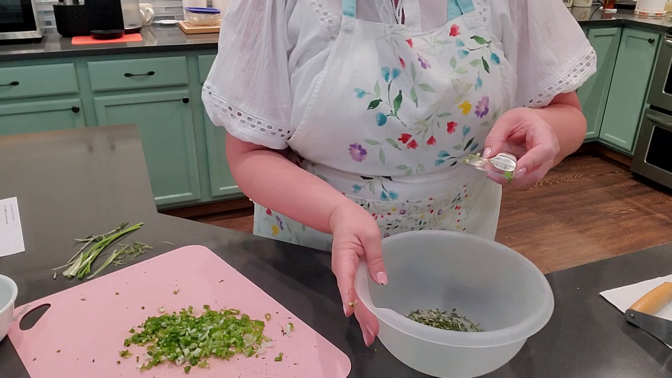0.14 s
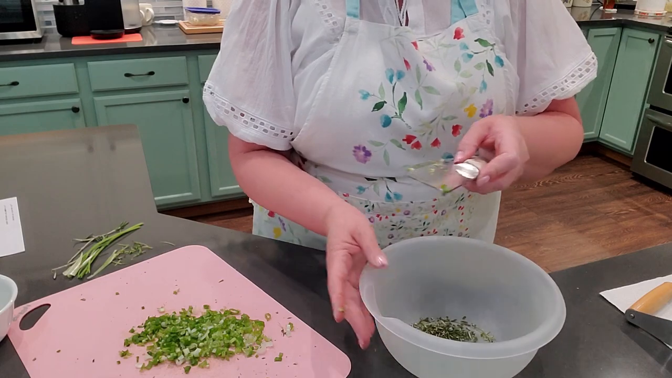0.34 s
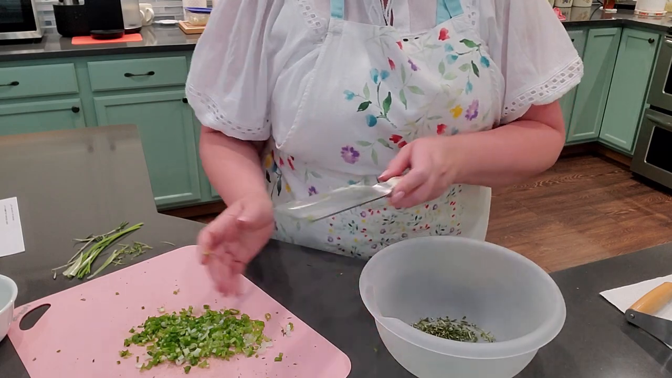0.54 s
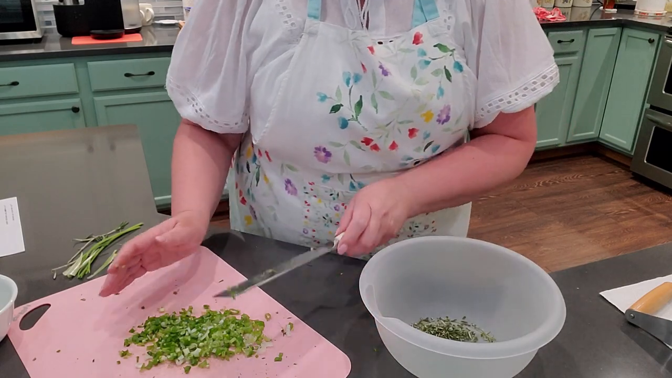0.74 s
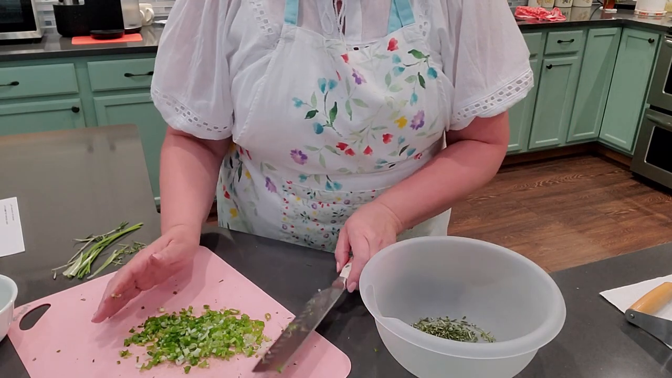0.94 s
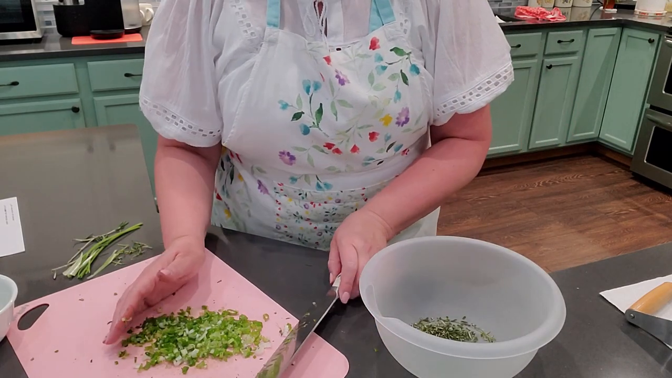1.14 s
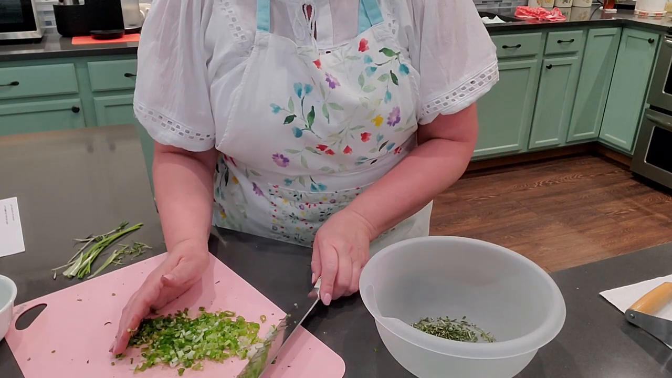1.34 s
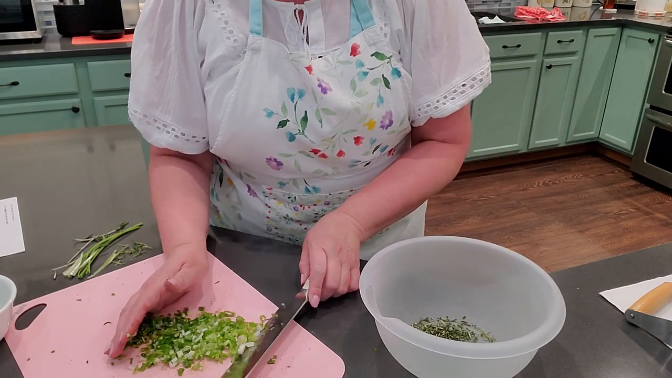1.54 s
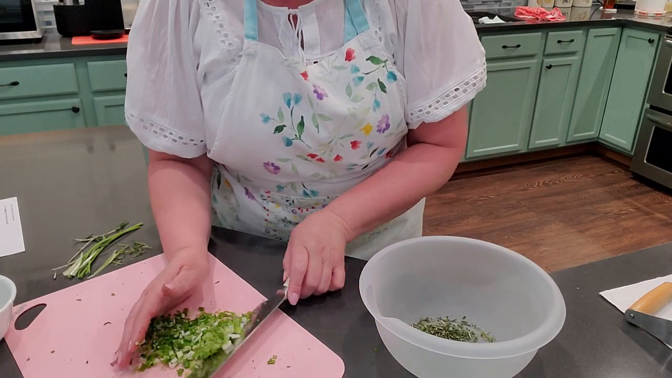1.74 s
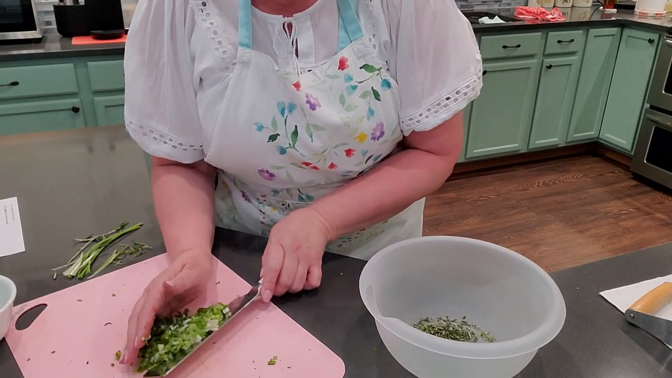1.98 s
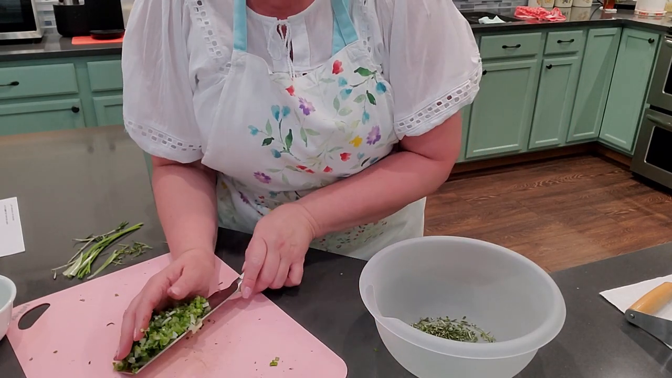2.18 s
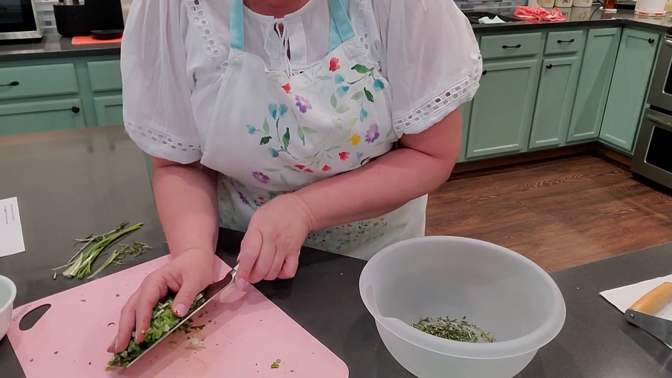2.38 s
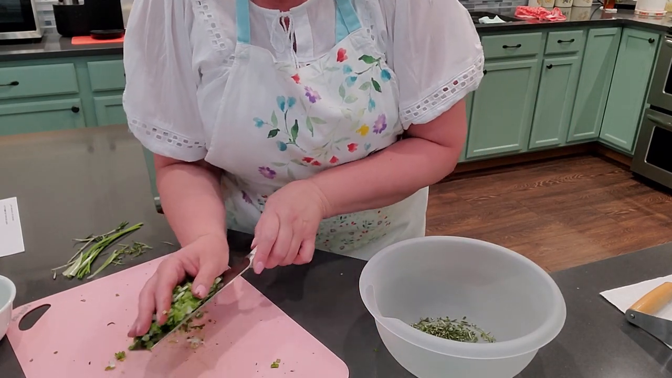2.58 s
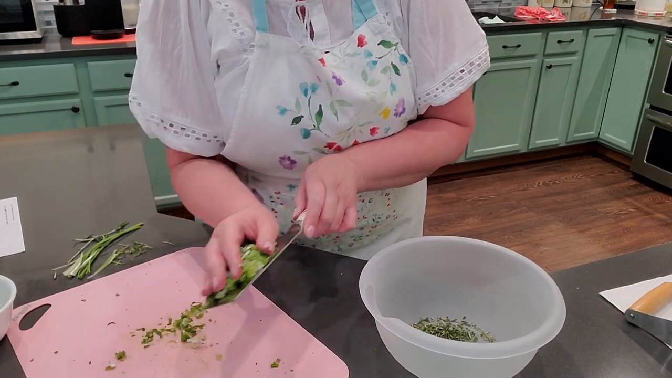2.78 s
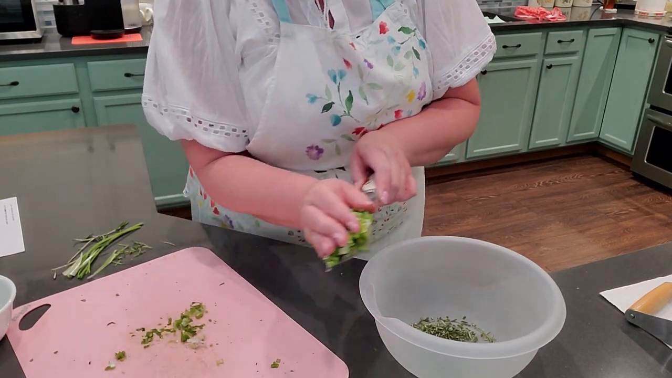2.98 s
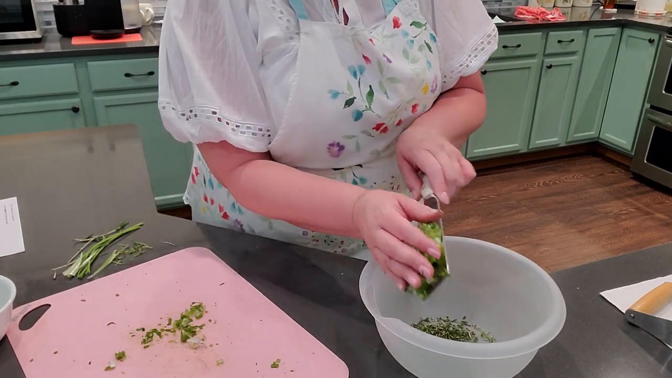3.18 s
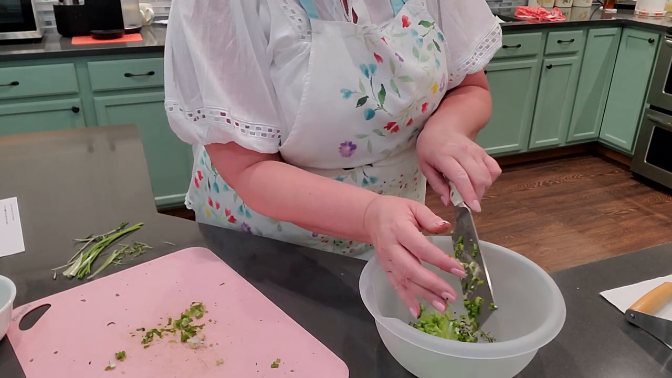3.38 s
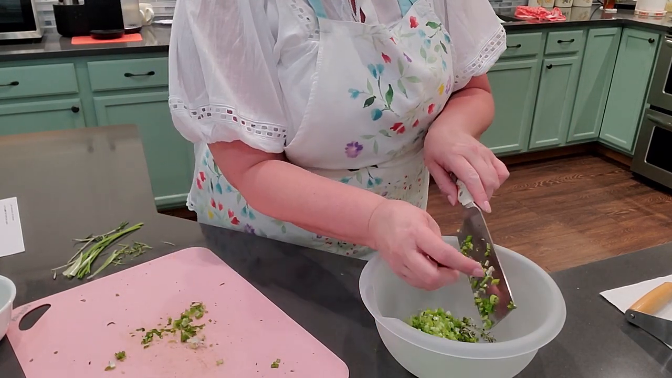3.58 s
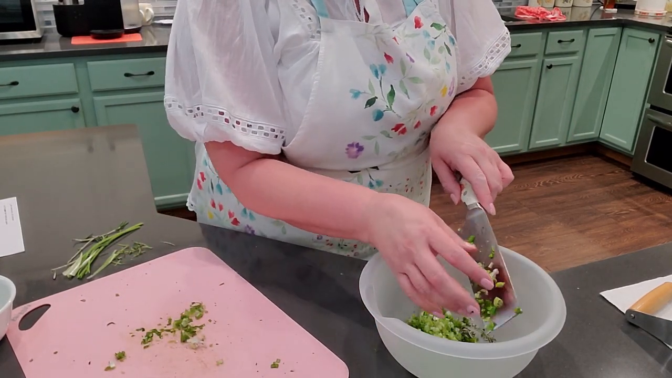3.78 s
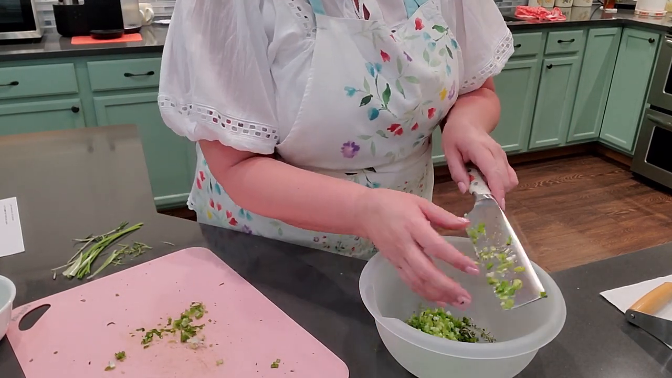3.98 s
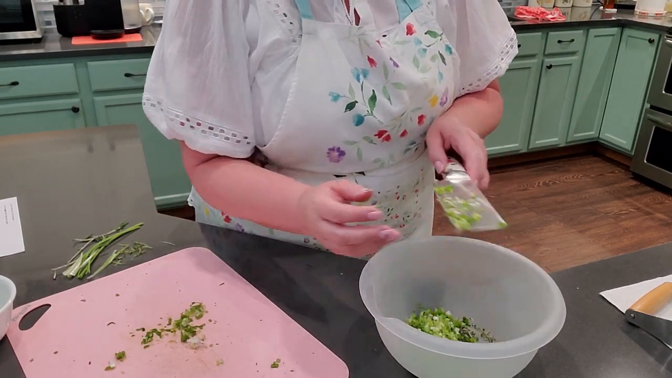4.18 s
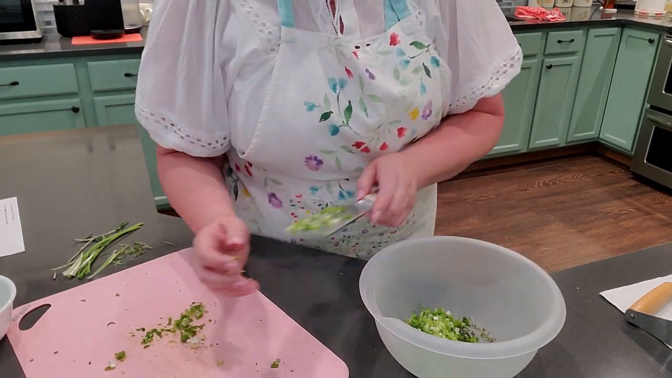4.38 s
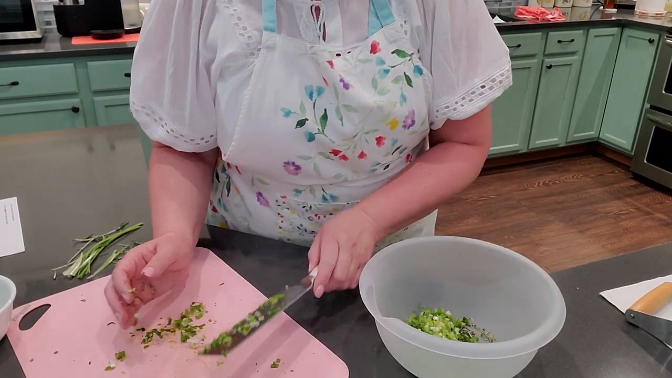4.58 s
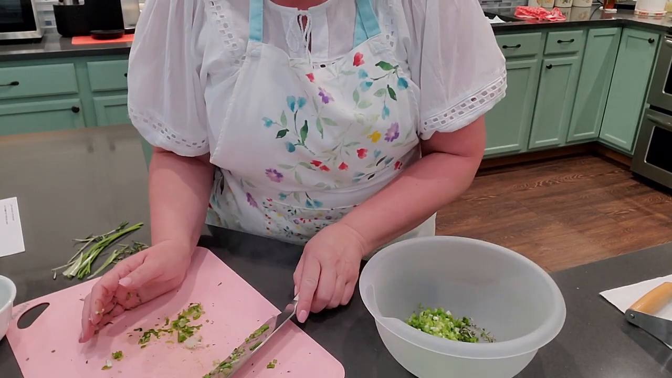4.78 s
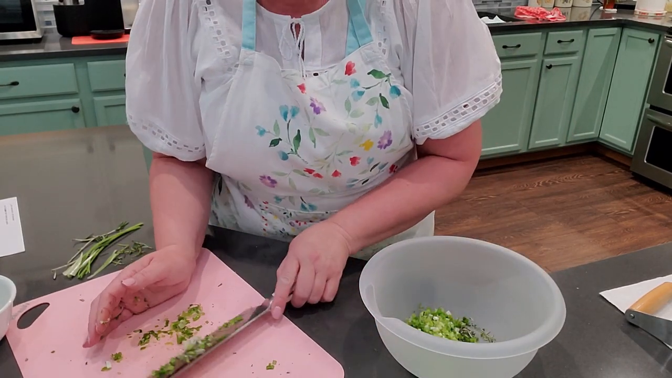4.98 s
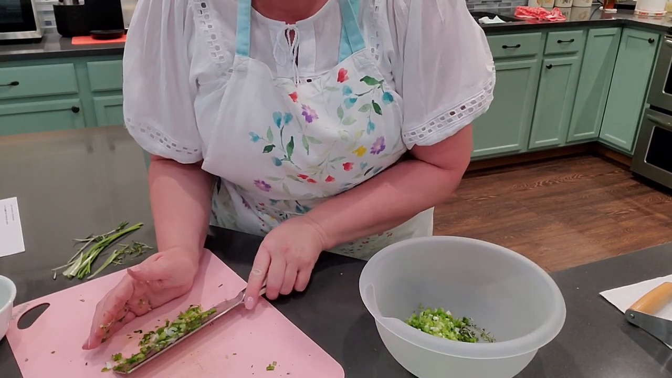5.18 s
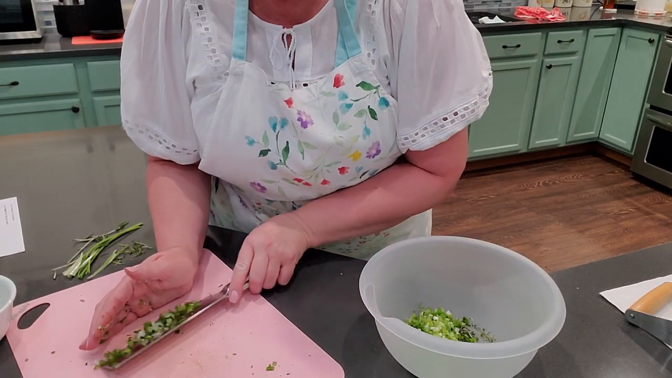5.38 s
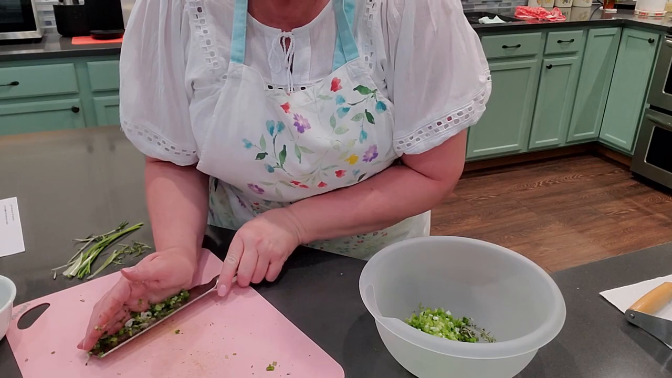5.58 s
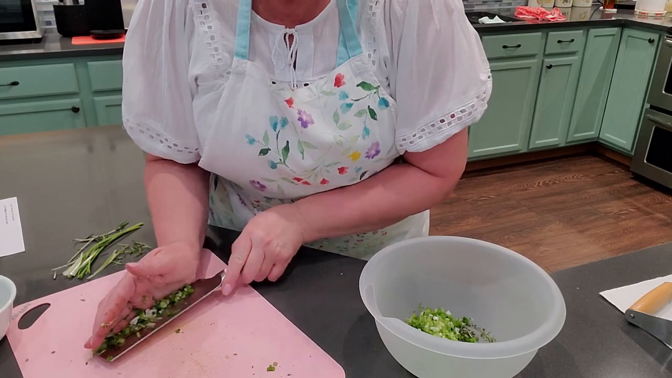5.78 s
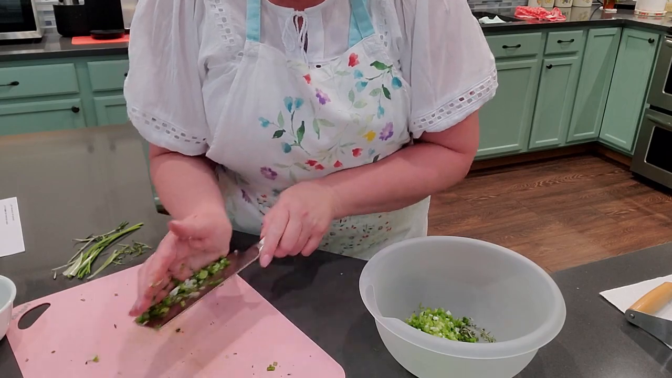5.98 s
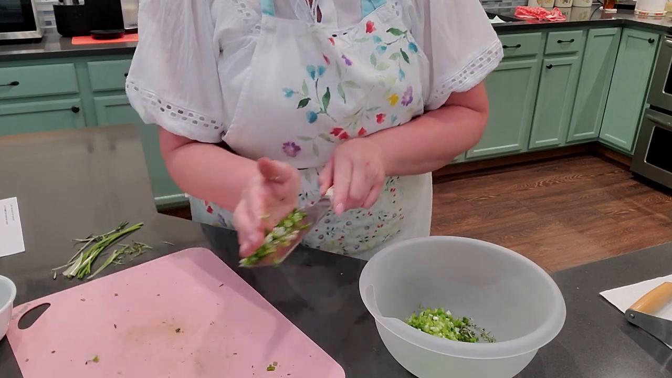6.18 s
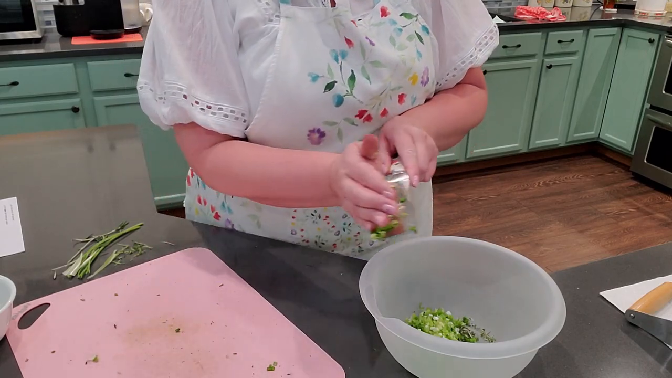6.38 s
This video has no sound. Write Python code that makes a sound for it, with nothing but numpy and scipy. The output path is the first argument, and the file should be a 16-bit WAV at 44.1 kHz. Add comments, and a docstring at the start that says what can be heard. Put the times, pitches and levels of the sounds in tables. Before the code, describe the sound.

Close phone pickup in an echoing kitchen: one very loud plastic bowl knock starts things, followed by faint sliding. A blade taps and rasps in uneven little pushes over a plastic cutting board. After a pause, wet onion bits drop into the bowl in a brief dull patter. A light click follows, then two strong clacks of the knife and brighter, shorter scraping, fading to quiet ventilation rumble.

```python
"""A chef's knife scrapes chopped green onions together on a plastic board: tiny jerks ring blade and board.
Before that a plastic bowl is set down on the counter: knocks rung through its resonances, then a skid.
The first load patters into the bowl as a shower of small clicks; the knife lands again, gathers the rest.
A phone close by hears it with the kitchen's echo, over a low steady rumble of filtered noise and faint tones."""
import sys
import numpy as np
from scipy import signal
from scipy.fft import rfft, irfft
from scipy.io import wavfile

SR = 44100
rng = np.random.default_rng(int(sys.argv[2]) if len(sys.argv) > 2 else 0)


def pcm_store(signal):
    """Save signal as 16-bit PCM."""
    levels = np.round(np.clip(np.atleast_2d(signal), -1, 1) * 32767)
    wavfile.write(sys.argv[1], SR, levels.astype(np.int16).T)


N = 283991
TIME = np.arange(N) / SR


def amp(db):
    """Decibels to gain."""
    return 10 ** (np.asarray(db) / 20)


def unit(x):
    """Scale to rms 1."""
    return x / np.sqrt(np.mean(x ** 2))


def along(points, hz):
    """Read (frequency [Hz], value) points on a logarithmic frequency axis."""
    point_hz, value = np.transpose(points)
    return np.interp(np.log(np.maximum(hz, 1)), np.log(point_hz), value)


def convolve(x, response):
    """Pass a sound through an impulse response, keeping its length."""
    return signal.oaconvolve(x, response)[:len(x)]


def band(x, lo_hz, hi_hz, order=3):
    """Butterworth band-pass."""
    sos = signal.butter(order, [lo_hz, min(hi_hz, SR / 2 - 1)], "band", fs=SR, output="sos")
    return signal.sosfilt(sos, x)


def ring(colour, modes=(), tilt_db_per_octave=0, size=8192):
    """Minimum-phase impulse response of a broad colour with resonances on top."""
    hz = np.fft.rfftfreq(size, 1 / SR)
    db = along(colour, hz) + tilt_db_per_octave * np.log2(np.clip(hz, 500, 8000) / 2000)
    for centre_hz, width_hz, peak_db in modes:
        db = db + peak_db / (1 + (2 * (hz - centre_hz) / width_hz) ** 2)
    # folding the cepstrum onto positive times makes the response causal
    cepstrum = irfft(np.log(amp(db)))
    cepstrum[1:size // 2] *= 2
    cepstrum[size // 2:] = 0
    return irfft(np.exp(rfft(cepstrum)))[:size // 2]


def walk(rate_hz):
    """Random curve: straight lines between normal draws taken at rate_hz."""
    draws = rng.standard_normal(N // 10)
    return np.interp(TIME * rate_hz, np.arange(N // 10), draws)


def grains(rate_hz, spread_db):
    """Tiny clicks of either sign at random moments, their strengths spread in dB."""
    present = rng.random(N) < rate_hz / SR
    sign = rng.choice([-1, 1], N)
    return present * sign * amp(spread_db * np.clip(rng.standard_normal(N), -2, 2))


def envelope(s, hold_s, rise_db_per_s, fall_db_per_s):
    """Gain that rises to 1 at s, holds, then dies away."""
    before_s = np.maximum(s - TIME, 0)
    after_s = np.maximum(TIME - s - hold_s, 0)
    return amp(-rise_db_per_s * before_s - fall_db_per_s * after_s)


def swells(table, rise_db_per_s, fall_db_per_s):
    """Gain of a run of movements; the strongest leads at each moment."""
    gains = [amp(db) * envelope(s, hold_s, rise_db_per_s, fall_db_per_s) for s, hold_s, db in table]
    return np.max(gains, axis=0)


def blows(table, colour, modes, crunch, crunch_s):
    """Each blow is a sharp push and a brief crunch of the contact, rung through the struck body."""
    out, t = np.zeros(N), TIME[:SR // 10]
    for s, db, tilt_db_per_octave in table:
        push = rng.standard_normal(len(t)) * np.exp(-t / crunch_s)
        push *= crunch / np.linalg.norm(push)
        push[0] = 1
        hit = convolve(push, ring(colour, modes, tilt_db_per_octave))
        start = int(s * SR)
        out[start:start + len(t)] += amp(db) * hit / np.linalg.norm(hit)
    return out


# short pushes of the knife: (full pressure at [s], hold [s], build-up [dB/s], board's rasp [dB],
# edge rasp re board's [dB], hiss re board's [dB])
KNIFE_PUSHES = [(1.006, 0.19, 150, -75, -3, -9.5), (1.194, 0.036, 700, -68, 3.5, -4),
                (1.317, 0.013, 1400, -40.5, -5.5, -11.5), (1.381, 0.038, 400, -42.5, -2, -13),
                (1.555, .03, 1300, -51.5, -5, -17.5), (1.6, .05, 500, -45, -4, -13.5),
                (1.69, .05, 400, -49.5, -1.5, -10), (1.756, 0.094, 700, -47.5, 2.5, -3),
                (1.888, 0.036, 400, -46, 1, -4.5), (2.01, 0.076, 400, -52, -2.5, -8),
                (2.094, .028, 400, -50, 1, -7), (2.39, 0.046, 400, -74, -7, -15.5),
                (4.92, .013, 900, -39, -1.5, -17), (4.959, 0.017, 500, -38, -2, -12),
                (5.08, 0.028, 300, -50.5, 4.5, 0.5), (5.135, 0.022, 400, -54.5, 5, -1),
                (5.273, .05, 400, -66.5, 12.5, 12), (5.342, .022, 400, -62, 10.5, 8),
                (5.466, 0.017, 430, -48, 8, 8), (5.497, 0.02, 400, -52, 8, 4.5)]
PUSH_EASE_DB_PER_S = 235.5


def push_gains():
    """Pressure sets the gains of board rasp, edge rasp and hiss; every push eases off alike."""
    gains = np.zeros((3, N))
    for s, hold_s, rise_db_per_s, db, edge_db, hiss_db in KNIFE_PUSHES:
        push = envelope(s, hold_s, rise_db_per_s, PUSH_EASE_DB_PER_S)
        gains = np.maximum(gains, np.outer(amp([db, db + edge_db, db + hiss_db]), push))
    return gains


# scraped board, broad colour: (frequency [Hz], level [dB])
BOARD_COLOUR = [(100, -32), (500, -19.5), (850, -24), (1100, -9), (2000, -3), (3200, -7.5), (5000, -5.5),
                (7000, -6.5), (10000, -13), (15000, -11.5)]
# blade and board resonances: (frequency [Hz], width [Hz], level [dB])
BOARD_RESONANCES = [(759, 144, 10), (1200, 480, 3.8), (1550, 480, 5.9), (2042, 120, 6.6), (2250, 40, 1.04),
                    (2590, 110, 2.7), (3060, 330, 10.3), (3417, 130, 6.8)]


def scraping(return_s=.0022, drift=0.127, return_share=0.36):
    """The edge slips over the scored plastic in countless small jerks that ring blade and board."""
    jerks = grains(rate_hz=2600, spread_db=4.5) * amp(1.6 * walk(rate_hz=140))
    # bending waves return from the board's rim; resonances shift as the contact travels
    delay_s = return_s * (1 + drift * walk(rate_hz=7))
    returned = np.interp(TIME - delay_s, TIME, jerks)
    rasp = convolve(jerks + return_share * returned, ring(BOARD_COLOUR, BOARD_RESONANCES))
    board = unit(band(rasp, 167, 1744))
    edge = unit(band(rasp, 2220, 4340))
    hiss = unit(band(rasp, 6300, 21600))
    return np.sum(push_gains() * [board, edge, hiss], axis=0)


# edge catches on one note: (time [s], length [s], first pitch [Hz], last pitch [Hz], level [dB])
EDGE_CHATTER = [(1.669, 0.045, 1200, 1200, -44.5), (1.739, 0.036, 1040, 1174, -43),
                (1.835, 0.16, 1449, 1517, -43), (1.997, .07, 1450, 1575, -44),
                (2.072, 0.078, 1109, 1184, -49), (2.091, 0.035, 2947, 3060, -48),
                (4.912, 0.012, 2300, 2260, -28), (4.916, 0.023, 1560, 1570, -33.5),
                (4.947, 0.067, 1147, 1253, -34.5), (5.011, 0.062, 1304, 1452, -43.5)]


def chatter(waver=0.016, rough_db=3.5):
    """Slips lock to one resonance: a short, rough squeak whose pitch follows the moving contact."""
    out = np.zeros(N)
    pitch_ratio = 1 + waver * walk(rate_hz=230)
    grip = amp(rough_db * walk(rate_hz=220))
    for s, length_s, first_hz, last_hz, db in EDGE_CHATTER:
        progress = np.clip((TIME - s) / length_s, 0, 1)
        hz = (first_hz + (last_hz - first_hz) * progress) * pitch_ratio
        squeak = np.sin(2 * np.pi * np.cumsum(hz) / SR)
        out += amp(db) * np.sin(np.pi * progress) * squeak
    return out * grip


# blade meets board: (time [s], level [dB], brightness [dB/octave])
BLADE_TAPS = [(1.1575, -13.5, 2.5), (1.2135, -30, 4.5), (1.231, -28, 1.5), (2.2225, -26.5, 8.5),
              (2.677, -37.5, -6.5), (2.715, -39.5, -2), (4.8099, -6, 1.5), (4.829, -18, 5.5),
              (4.914, -14, 1.5), (4.9305, -9, 1.5), (5.832, -39, 8.5), (5.862, -35.5, -6)]
# knocked board, broad colour: (frequency [Hz], level [dB])
KNOCK_COLOUR = [(100, -10), (500, -16), (800, -1.5), (1200, 8), (1700, -2), (2100, -0.5), (3200, -13),
                (5000, -14.5), (10000, -28), (15000, -23)]


def knife_taps():
    """The blade lands on the board: a push and crunch ring the board's resonances."""
    return blows(BLADE_TAPS, KNOCK_COLOUR, BOARD_RESONANCES, crunch=1.25, crunch_s=.0055)


# knife lifted away: (time [s], level [dB], brightness [dB/octave])
LIFT_CLICKS = [(4.2708, -23, -2.5)]
# click, broad colour: (frequency [Hz], level [dB])
CLICK_COLOUR = [(300, -20), (1600, -10.5), (2200, 7.5), (4400, 7), (6000, -8), (10000, -18), (15000, -23)]
# click resonances: (frequency [Hz], width [Hz], level [dB])
CLICK_RESONANCES = [(2260, 160, 8.1), (3690, 110, 4.3)]


def knife_click():
    """Lifting the knife away gives a light click: a brief crunch in a narrow treble colour."""
    return blows(LIFT_CLICKS, CLICK_COLOUR, CLICK_RESONANCES, crunch=1.0, crunch_s=0.00096)


# wet pieces strike the bowl's wall: (time [s], level [dB], brightness [dB/octave])
PIECE_HITS = [(3.253, -32, -3), (3.268, -30.5, 3.5), (3.3025, -40, 5), (3.327, -28.5, 0.5),
              (3.3485, -23, -0.5), (3.353, -28, 2), (3.383, -22.5, -1), (3.397, -18, -2),
              (3.539, -30.5, 0.5)]
# heap slides off the blade, then stragglers: (full flow at [s], hold [s], level [dB])
ONION_POURS = [(3.352, .02, -53), (3.388, 0.0068, -44), (3.45, 0.043, -61), (3.65, 0.026, -73.5)]
POUR_RISE_DB_PER_S, POUR_FALL_DB_PER_S = 650, 320
# soft contact on the bowl, broad colour: (frequency [Hz], level [dB])
SOFT_COLOUR = [(100, -20), (400, -4.5), (750, -4.5), (1400, -7.5), (1900, 0.5), (2800, -0.5), (4000, -2.5),
               (7000, -12), (9500, -24), (12000, -20), (15000, -24.5)]
# bowl resonances: (frequency [Hz], width [Hz], level [dB])
BOWL_RESONANCES = [(104.7, 15, 12), (318, 58, 1.7), (475.5, 30, 11), (680, 60, 5.1), (795, 60, 5.6),
                   (905, 32, 4), (1297, 180, 13), (2150, 390, 5), (2700, 100, 4), (4800, 360, 5)]


def onions():
    """A shower of small soft pieces, with single larger ones, drums on the bowl."""
    drops = grains(rate_hz=1600, spread_db=4.5)
    shower = unit(convolve(drops, ring(SOFT_COLOUR, BOWL_RESONANCES)))
    flow = swells(ONION_POURS, POUR_RISE_DB_PER_S, POUR_FALL_DB_PER_S)
    larger = blows(PIECE_HITS, SOFT_COLOUR, BOWL_RESONANCES, crunch=0.96, crunch_s=0.0039)
    return shower * flow + larger


# bowl lands and settles: (time [s], level [dB], brightness [dB/octave])
LANDING_KNOCKS = [(.0527, 6.5, 1.7), (.0537, 1, -5), (.0549, 4, -4), (.2856, -24, 0), (.338, -26, -1.5)]
# foot skids on landing, creeps, is nudged into place: (full level at [s], hold [s], level [dB])
FOOT_SKIDS = [(.055, 0.0024, -35.5), (.17, 0.097, -59.5), (.285, 0.031, -55.5)]
SKID_RISE_DB_PER_S, SKID_FALL_DB_PER_S = 5001, 279.5
# knocked bowl, broad colour: (frequency [Hz], level [dB])
BOWL_COLOUR = [(40, -21), (130, -7.5), (300, 9), (520, 4), (850, 1), (1500, -8), (2200, 0.5), (3000, -5),
               (4000, -7.5), (5600, -16.5), (7000, -16), (9500, -23), (12500, -19.5), (15500, -23.5)]


def bowl():
    """The light bowl's hard foot touches the counter at several points in quick turn, then slides to rest."""
    knocks = blows(LANDING_KNOCKS, BOWL_COLOUR, BOWL_RESONANCES, crunch=.45, crunch_s=.002)
    slips = grains(rate_hz=1800, spread_db=1.0)
    slide = unit(convolve(slips, ring(SOFT_COLOUR, BOWL_RESONANCES, tilt_db_per_octave=0.46)))
    return knocks + slide * swells(FOOT_SKIDS, SKID_RISE_DB_PER_S, SKID_FALL_DB_PER_S)


# narrow rustles of the blade, hand and onion pieces: (time [s], length [s], band [Hz], level [dB])
RUSTLES = [(0.42, .05, 2900, -66), (3.294, 0.02, 2900, -57), (3.43, 0.19, 2700, -70),
           (3.61, 0.12, 12200, -79), (5.065, 0.055, 3060, -42), (5.252, 0.078, 2430, -50.5),
           (5.308, 0.095, 2700, -48.5)]


def brushes():
    """Brief slips of blade, hand or onion pieces: a narrow rustle."""
    out = np.zeros(N)
    slips = grains(rate_hz=2600, spread_db=2.0)
    for s, length_s, hz, db in RUSTLES:
        swell = np.sin(np.pi * np.clip((TIME - s) / length_s, 0, 1))
        out += amp(db) * swell * unit(band(slips, hz / 1.27, hz * 1.1, order=2))
    return out


# kitchen's reverberation: (frequency [Hz], decay by 60 dB [s])
KITCHEN_T60 = [(150, 0.62), (600, 0.34), (2000, 0.34), (5000, 0.46), (9000, 0.3), (15000, .25)]


def kitchen(x, lag_s, scatter_db, echo_db, tail_db, shared_hz=900):
    """Direct sound, treble scattered by things nearby, a wall and a ceiling echo, and the diffuse tail."""
    t = TIME[:SR * 2 // 3]
    hz = np.fft.rfftfreq(len(t), 1 / SR)
    octaves_hz = 62.5 * 2 ** np.arange(9)
    common, apart = rfft(rng.standard_normal((2, len(t))))
    # long waves reach both ports alike
    likeness = 1 / (1 + (hz / shared_hz) ** 2)
    out = []
    for side in (1, -1):  # left, right
        noise = common * np.sqrt(1 + likeness) + side * apart * np.sqrt(1 - likeness)
        tail = np.zeros(len(t))
        for octave_hz in octaves_hz:
            weight = along(list(zip(octaves_hz, octaves_hz == octave_hz)), hz)
            decay = amp(-60 * t / along(KITCHEN_T60, octave_hz))
            tail += irfft(noise * weight, len(t)) * decay
        tail = tail / np.linalg.norm(tail) * (1 - np.exp(-t / 0.0048))
        scatter = band(rng.standard_normal(len(t)), 3000, 17000, order=1) * np.exp(-t / 0.0043)
        response = amp(tail_db) * tail + amp(scatter_db) * scatter / np.linalg.norm(scatter)
        response[0] += 1
        response[int((.0098 + side * .0002) * SR)] += amp(echo_db)
        response[int((.0222 + side * .0001) * SR)] += amp(echo_db)
        out.append(np.roll(convolve(x, response), round(side * lag_s * SR / 2)))
    return np.array(out)


# ventilation rumble, colour: (frequency [Hz], level [dB])
RUMBLE_COLOUR = [(12, -64.5), (20, -18), (38, -6), (66, -2), (122, -4.5), (148, -14.5), (185, -12.5),
                 (352, -19), (393, -16.5), (439, -21), (581, -19), (1720, -40.5), (6540, -49.5),
                 (7950, -57), (15500, -48.5)]
# stereo width of the rumble: (frequency [Hz], side re mid [dB])
RUMBLE_WIDTH = [(60, -20), (250, -9.5), (600, -3.5), (1500, -0.5), (4000, 0.5)]
# steady appliance tones: (frequency [Hz], level [dB])
APPLIANCE_TONES = [(58, -69.5), (393, -74), (3548, -92.5)]
RUMBLE_DB = -55


def background():
    """Ventilation rumble, alike at both ports in the bass, and faint appliance tones of wavering pitch."""
    colour = ring(RUMBLE_COLOUR)
    mid = unit(convolve(rng.standard_normal(N), colour))
    side = unit(convolve(rng.standard_normal(N), colour))
    side = convolve(side, ring(RUMBLE_WIDTH))
    hum = np.zeros(N)
    for hz, db in APPLIANCE_TONES:
        phase = 2 * np.pi * np.cumsum(hz + 2.5 * walk(rate_hz=12)) / SR
        hum += amp(db) * np.sqrt(2) * np.sin(phase)
    level = amp(RUMBLE_DB + .7 * walk(rate_hz=5.6))
    return level * np.array([mid + side, mid - side]) + hum


def scene():
    """Board and bowl stand on either side of the phone, so their sounds reach opposite ports first."""
    rasp = scraping() + chatter()
    # the contact shifts between tip and heel; each place has its own paths to the phone
    shift_rad = 0.94 * walk(rate_hz=14) + np.pi / 4
    tip = rasp * np.cos(shift_rad) + knife_taps()
    heel = rasp * np.sin(shift_rad)
    on_board = sum(kitchen(x, lag_s=-.00005, scatter_db=1, echo_db=-11, tail_db=-5.0) for x in (tip, heel))
    bowl_side = onions() + bowl() + knife_click() + brushes()
    at_bowl = kitchen(bowl_side, lag_s=.00014, scatter_db=-0.5, echo_db=-10, tail_db=-6.5)
    return on_board + at_bowl + background()


# microphone ports, colour: (frequency [Hz], level [dB])
LEFT_COLOUR = [(1000, -1.5), (3000, 1.5), (5500, 3.5), (11000, 0), (13000, -5), (15500, -9)]
RIGHT_COLOUR = [(1000, -2), (3000, 1.5), (6000, -1), (7500, 6.5), (9700, -8.5), (13000, 4.5), (15500, -3)]
# microphone ports, resonances and notches: (frequency [Hz], width [Hz], level [dB])
LEFT_RESONANCES = [(6630, 450, 10.5), (7980, 1230, -23.5), (11400, 3400, 7.5)]
RIGHT_RESONANCES = [(8310, 700, -15)]
TOP_HZ = 15850


def record(dry):
    """Each port colours the treble and has a deep notch; peaks past full scale clip, then the top is cut."""
    left = convolve(dry[0], ring(LEFT_COLOUR, LEFT_RESONANCES))
    right = convolve(dry[1], ring(RIGHT_COLOUR, RIGHT_RESONANCES))
    clipped = np.clip([left, right], -1, 1)
    return signal.sosfilt(signal.ellip(10, .2, 70, TOP_HZ, fs=SR, output="sos"), clipped)


dry = scene()
out = record(dry)
pcm_store(out)
```